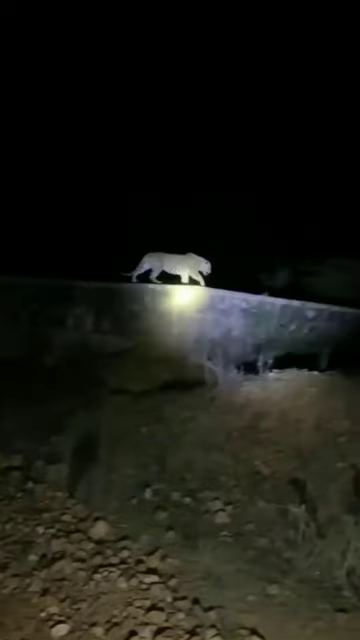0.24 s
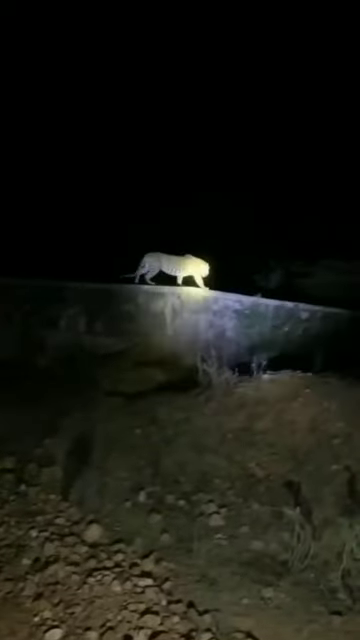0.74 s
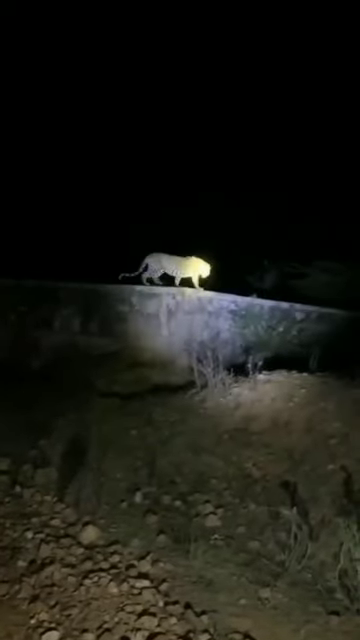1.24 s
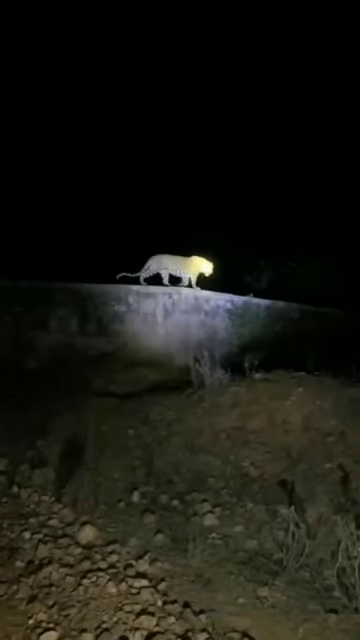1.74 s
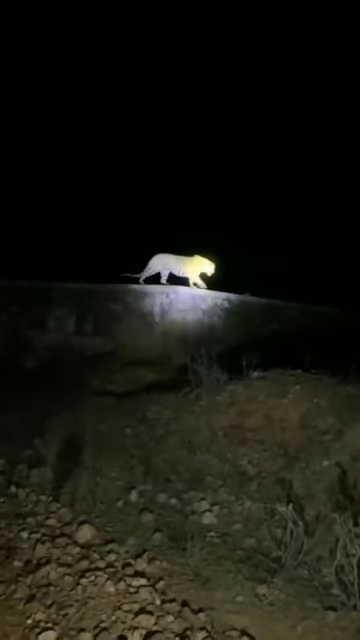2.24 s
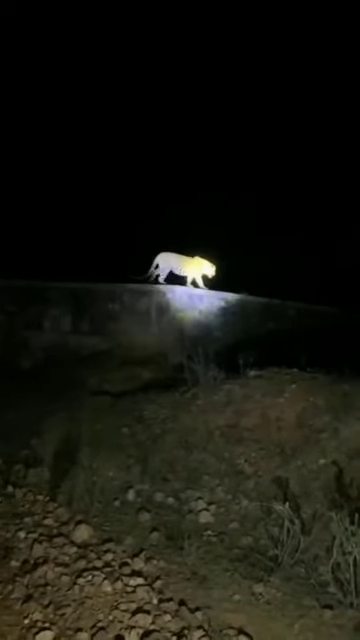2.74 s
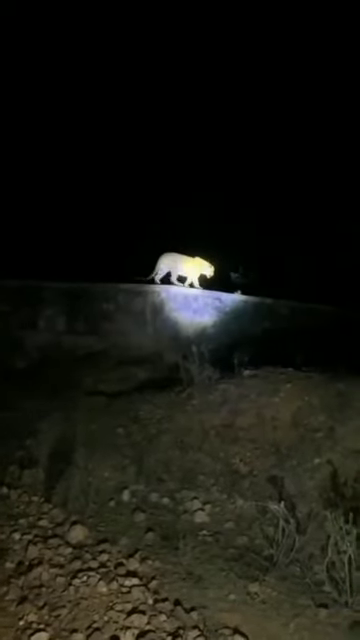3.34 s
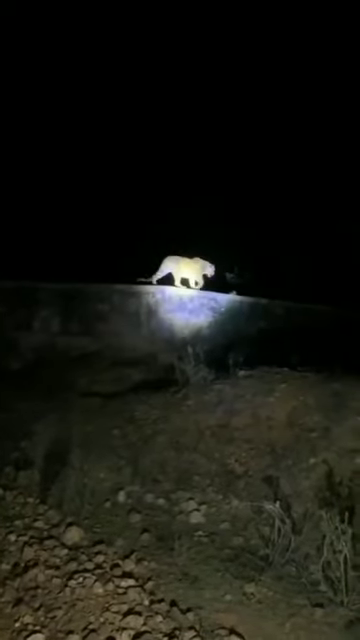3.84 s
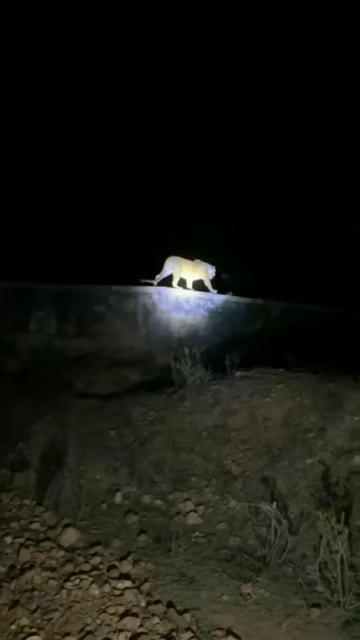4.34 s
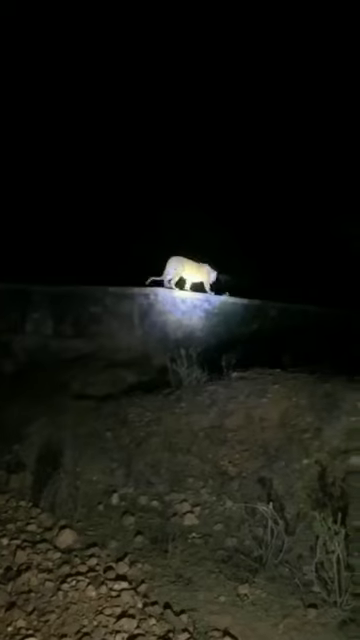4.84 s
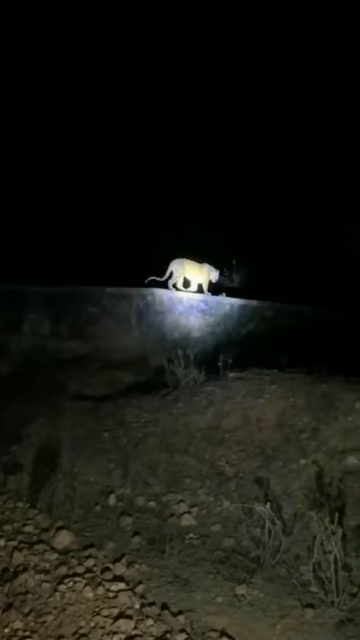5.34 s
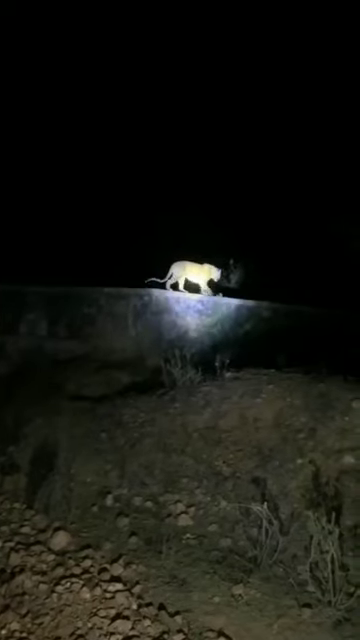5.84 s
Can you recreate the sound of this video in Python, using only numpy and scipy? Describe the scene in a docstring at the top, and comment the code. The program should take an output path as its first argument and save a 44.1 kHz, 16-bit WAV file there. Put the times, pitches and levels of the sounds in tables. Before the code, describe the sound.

A leopard calls in the open at night. A hoarse, breathy roar is already under way and dies away; a low pulsing growl then swells into a loud, crackling roar, sinks back to a rattle and ends in a soft moan. After a brief lull, a huff leads into a short tearing snarl with a fading noise tail. Wall and rocks return short echoes; a low rumble and faint hiss lie beneath. The cat sits slightly right.

```python
"""A leopard's roars at night

Three calls, a little to the right: a hoarse roar dies away; a long growl swells into a roar and ends in a soft moan;
a huff leads into a short, tearing snarl with a smooth, fading noise tail. Slack vocal folds slap some 20-36 times
a second: slaps and turbulence excite the resonances of chest, throat and mouth; hard closures add snaps and spray.
Wall and rocky ground add echoes and a scattered tail; dry ticks, a faint tone, a low rumble and faint hiss join in."""
import sys
import numpy as np
from scipy import signal
from scipy.fft import rfft, irfft, next_fast_len
from scipy.io import wavfile
from scipy.ndimage import uniform_filter1d, map_coordinates

SR = 44100
rng = np.random.default_rng(int(sys.argv[2]) if len(sys.argv) > 2 else 0)


def to_wav(sig):
    """Store sig (one row per channel, or 1-D mono) as 16-bit WAV at the path in sys.argv[1].

    Samples outside -1..1 are clipped; the rate is SR.
    """
    pcm = np.clip(np.atleast_2d(sig), -1, 1) * 32767
    pcm = np.round(pcm).astype(np.int16)
    wavfile.write(sys.argv[1], SR, pcm.T)  # frames by channels


N = 268153
TIME = np.arange(N) / SR

# slaps that crack out above their neighbours:
# (time [s], snap peak level [dB], snap frequency [Hz], spray level [dB])
CRACK_EVENTS = [(.197, -22.5, 1160, -48), (.225, -20.5, 1220, -49), (.259, -23, 1160, -50.5),
                (0.965, -32, 1310, -72), (1.044, -37, 1360, -74), (1.09, -34, 1420, -75),
                (1.127, -35, 1370, -71), (1.241, -34, 1446, -61), (1.279, -34, 1436, -57),
                (1.39, -34, 1390, -36), (1.427, -32, 1250, -50), (1.468, -26, 1490, -36.5),
                (1.506, -35, 1340, -44.5), (1.543, -25, 1452, -44.5), (1.621, -39, 1207, -39.5),
                (1.835, -23.5, 1387, -44), (1.902, -21.5, 1424, -48), (1.969, -19, 1240, -42),
                (2.002, -19.5, 1310, -41.5), (2.037, -17.5, 1300, -36), (2.101, -14, 1406, -40),
                (2.131, -20.5, 1203, -37.5), (2.161, -18.5, 1300, -37.5), (2.189, -17, 1280, -41),
                (2.245, -10, 1334, -28), (2.272, -11.5, 1320, -25), (2.33, -13.5, 1246, -22),
                (2.359, -11.5, 1250, -26.5), (2.419, -13, 1248, -28.5), (2.447, -11, 1320, -26),
                (2.506, -13.5, 1357, -39), (2.537, -12, 1320, -37), (2.569, -10, 1320, -30.5),
                (2.637, -17.5, 1335, -48.5), (2.674, -12, 1346, -43), (2.711, -17, 1347, -48.5),
                (2.749, -17.5, 1376, -39), (3.031, -30.5, 1410, -48.5), (3.198, -36, 1500, -70),
                (3.239, -37, 1410, -63), (3.32, -38, 1500, -74), (3.364, -38, 1470, -68),
                (4.503, -24.5, 1153, -68), (4.532, -20.5, 1060, -39.5), (4.569, -23, 1130, -38),
                (4.6, -16, 1190, -30), (4.636, -15, 1140, -32), (4.672, -26, 1140, -49.5),
                (4.709, -22, 1130, -48), (4.79, -22, 1300, -45.5), (4.832, -21, 1300, -36),
                (4.919, -27.5, 1130, -49), (4.974, -28, 1090, -48), (5.006, -30.5, 1256, -54),
                (5.056, -34.5, 1130, -58)]


def amp(db):
    """Level and amplitude: 20 dB is a factor of ten."""
    return 10 ** (np.asarray(db) / 20)


def unit(x):
    """Normalisation: x at a root-mean-square value of 1."""
    return x / np.sqrt(np.mean(x ** 2) + 1e-20)


def along(points, hz):
    """Interpolation of (frequency [Hz], value) points on a logarithmic frequency axis."""
    f, v = np.transpose(points)
    return np.interp(np.log(hz + 1), np.log(f + 1), v)


def curves(rows, t):
    """Linear interpolation of each column after the first, at the times t."""
    s, *cols = np.transpose(rows)
    return [np.interp(t, s, c) for c in cols]


def wobble(rate):
    """Band-limited randomness: a smooth curve through random knots, rate of them a second."""
    return map_coordinates(rng.standard_normal(int(N * rate / SR) + 4), [TIME * rate])


def coloured(x, gain):
    """Minimum-phase filtering: folding the cepstrum makes the filter with this gain causal."""
    m = 2 * next_fast_len((len(x) + SR // 4) // 2, True)
    log_gain = np.log(np.maximum(gain(np.fft.rfftfreq(m, 1 / SR)), 1e-6))
    cepstrum = irfft(log_gain, m)
    cepstrum[1:m // 2] *= 2
    cepstrum[m // 2 + 1:] = 0
    response = np.exp(rfft(cepstrum))
    return irfft(rfft(x, m) * response, m)[:len(x)]


def shaped(x, spectrum):
    """Spectral shaping: x filtered by (frequency [Hz], gain [dB]) points, at rms 1."""
    return unit(coloured(x, lambda hz: amp(along(spectrum, hz))))


def ring(x, modes):
    """Resonance: x excites a sum of steep-sided peaks, at rms 1."""
    def peak(f, centre, width):
        return 1 / (1 + .5 * ((centre ** 2 - f ** 2) / (f * width + 1)) ** 2) ** 2

    def gain(f):
        return sum(amp(db) * peak(f, centre, width) for centre, width, db in modes)

    return unit(coloured(x, gain))


def glided(x, modes, tuning):
    """Frequency scaling by a warped clock: all resonances slide by the factor tuning."""
    clock = np.cumsum(np.clip(tuning, .5, 2))
    steps = np.arange(int(clock[-1]) + 1)
    warped = np.interp(steps, clock, x)
    return np.interp(clock, steps, ring(warped, modes))


def even(x):
    """Envelope normalisation: slow swells are levelled, so that later gains set the loudness."""
    power = uniform_filter1d(uniform_filter1d(x ** 2, SR // 12), SR // 12)
    return x / np.sqrt(np.abs(power) + 1e-3)


def night():
    """Filtered noise: a steady low rumble, and a faint broadband hiss, its level falling steadily."""
    # rumble spectrum: (frequency [Hz], relative level [dB])
    rumble_spectrum = [(15, -12.5), (30, 2.5), (50, 2), (63, -7), (88, -23), (300, -23.5), (520, -35.5),
                       (750, -41.5), (1200, -46), (2000, -58), (4000, -68.5), (12000, -73.5)]
    # hiss spectrum: (frequency [Hz], relative level [dB])
    hiss_spectrum = [(200, -11), (1500, 4), (4000, 2.5), (8500, -3.5), (10000, -12.5), (13000, -15.5)]
    rumble_db, hiss_start_db, hiss_fall_db_per_s = -50.5, -72, 3.0
    rumble = amp(rumble_db) * shaped(rng.standard_normal(N), rumble_spectrum)
    hiss = shaped(rng.standard_normal(N), hiss_spectrum)
    return rumble + amp(hiss_start_db - hiss_fall_db_per_s * TIME) * hiss


def outdoors(x):
    """Reflection and scattering: discrete echoes off ground and wall, then a thin tail from the rocks."""
    # decay of the scattered tail: (frequency [Hz], time to fall 60 dB [s])
    tail_decay = [(100, 0.43), (500, 0.81), (1200, 0.42), (3000, 0.15), (9000, 0.064)]
    # echoes off ground and wall: (delay [s], level [dB])
    reflections = [(.0062, -13), (0.0119, -18.5), (.021, -15)]
    tail_db = -13
    hz, t, z = signal.stft(rng.standard_normal(SR), SR, nperseg=256)
    fading = z * amp(-60 * t / along(tail_decay, hz)[:, None])
    tail = signal.istft(fading, SR, nperseg=256)[1]
    answer = amp(tail_db) * tail / np.linalg.norm(tail)
    for delay, db in reflections:
        answer[round(delay * SR)] += amp(db)
    return x + signal.fftconvolve(x, answer)[:N]


def hoot(s=5.59, hz=595, db=-64, length=0.015):
    """Tone burst: a faint sinusoid under a Gaussian envelope."""
    return amp(db) * np.exp(-((TIME - s) / length) ** 2) * np.sin(2 * np.pi * hz * TIME)


def ticks():
    """Decaying noise bands: short dry rasps and ticks, each around its own frequency."""
    # (time [s], level [dB], centre [Hz], width [Hz], time to fall 60 dB [s])
    tick_events = [(1.341, -31.5, 670, 1400, 0.043), (1.337, -57, 3195, 3600, 0.33),
                   (4.42, -64, 2655, 5130, 0.017), (5.765, -75, 1927, 1615, 0.055),
                   (5.893, -79.5, 2100, 1606, 0.043), (5.912, -70, 1175, 805, 0.21)]
    out, t = np.zeros(N + SR), np.arange(SR // 3) / SR
    for s, db, hz, width, t60 in tick_events:
        burst = ring(rng.standard_normal(len(t)), [(hz, width, 0)])
        out[round(s * SR):][:len(t)] += amp(db - 60 * t / t60) * burst
    return out[:N]


def huff():
    """Turbulent flow: air rushes through the throat, starting ahead of the snarl and running on beneath it."""
    # spectrum of the rushing air: (frequency [Hz], relative level [dB])
    huff_spectrum = [(60, -11.5), (150, 0), (400, 3), (600, 3.5), (780, -16.5), (980, -9.5), (1350, -12.5),
                     (1800, -29), (5000, -58), (12000, -58.5)]
    start_s, attack_s, hold_s, release_s, level_db = 4.33, 0.047, 0.48, .04, -48.5
    corners = start_s + np.cumsum([0, attack_s, hold_s, release_s])
    opening = np.interp(TIME, corners, [0, 1, 1, 0])
    return amp(level_db) * opening * shaped(rng.standard_normal(N), huff_spectrum)


def moan():
    """Frequency modulation: a soft wavering tone through the closed mouth, husky with resonant noise."""
    # (time [s], mean pitch [Hz], level [dB])
    moan_course = [(3.5, 143.9, -62), (3.66, 168.6, -44), (3.72, 194.6, -50), (3.9, 195, -60.5),
                   (4.02, 171, -53), (4.15, 195, -66.5), (4.33, 183, -74.5)]
    tone_db, murk_db = -4, -1  # relative to that level
    pitch, level = curves(moan_course, TIME)
    waver = 1 + .05 * wobble(40)
    tone = np.sqrt(2) * np.sin(2 * np.pi * np.cumsum(pitch * waver) / SR)
    murk = ring(rng.standard_normal(N), [(122.3, 46, 0.5), (195, 48, -2.5), (350, 31, -10.5)])
    sounding = (TIME > moan_course[0][0]) * (TIME < moan_course[-1][0])
    return amp(level) * (amp(tone_db) * tone + amp(murk_db) * murk) * sounding


def noise_tail():
    """Sliding resonance: a smooth, fading noise around 1.1-1.3 kHz, sinking slightly, behind the snarl."""
    # bands of the tail at its start: (frequency [Hz], width [Hz], relative level [dB])
    tail_modes = [(1090, 117, 3), (1320, 130, 0)]
    start_s, attack_s, level_db, fade_db_per_s, sag_per_s = 4.984, .05, -50.5, 80, 0.15
    age = np.maximum(TIME - start_s, 0)
    noise = glided(rng.standard_normal(N), tail_modes, 1 - sag_per_s * age)
    return amp(level_db - fade_db_per_s * age) * np.minimum(age / attack_s, 1) * noise


def tears():
    """Modulated turbulence: ragged bursts of air excite the high resonances of the throat."""
    # air tearing through the throat: (time [s], length [s], level [dB])
    tear_events = [(4.753, 0.026, -46), (4.788, .026, -49), (4.911, .03, -51), (4.956, 0.035, -51.5),
                   (5.042, .026, -61)]
    # resonances of the throat: (frequency [Hz], width [Hz], relative level [dB])
    tear_modes = [(1920, 400, 2), (2610, 450, 2.5), (3116, 220, -10), (4410, 460, -10.5)]
    ragged_db, rips_per_s = 5, 260
    rips = amp(ragged_db * wobble(rips_per_s)) * rng.standard_normal(N)
    flow = np.zeros(N)
    for s, length, db in tear_events:
        progress = np.clip((TIME - s) / length, 0, 1)
        flow += amp(db) * np.sqrt(np.abs(np.sin(np.pi * progress)))
    return flow * ring(rips, tear_modes)


def cracks():
    """Impulse excitation: hard closures give a short snap, a ringing mouth and a bright spray of air."""
    # the mouth rings on behind a crack: (frequency [Hz], width [Hz], relative level [dB])
    body_modes = [(980, 180, 2.5), (1300, 230, 1.5), (1576, 120, -2.5)]
    # mean resonances of the spray: (frequency [Hz], width [Hz], relative level [dB])
    spray_modes = [(2150, 770, 5), (2740, 450, 9.5), (4290, 1200, -11.5), (7550, 4300, -23.5)]
    snap_width_hz = 336
    body_db, body_t60_s = -9, 0.046  # level relative to the snap's peak
    rise_s, spray_t60_s = .0007, .024
    varies_db, varies_share = 3, .04  # spread of the spray's resonances from crack to crack
    out, t = np.zeros(N + SR), np.arange(SR // 10) / SR
    rise = 1 - np.exp(-t / rise_s)
    for s, db, hz, spray_db in CRACK_EVENTS:
        snap = ring(1.0 * (t == 0), [(hz, snap_width_hz, 0)])
        body_noise = ring(rng.standard_normal(len(t)), body_modes)
        body = amp(db + body_db - 60 * t / body_t60_s) * body_noise
        colour = [(f * rng.normal(1, varies_share), width, rng.normal(level, varies_db))
                  for f, width, level in spray_modes]
        spray_noise = ring(rng.standard_normal(len(t)), colour)
        spray = amp(spray_db - 60 * t / spray_t60_s) * spray_noise
        crack = amp(db) * snap / np.abs(snap).max() + rise * (body + spray)
        out[round(s * SR):][:len(t)] += crack
    return out[:N]


def folds(rate, t, scatter_db=2.0):
    """Relaxation oscillation: returns slaps, sharpness of closure, non-cracking slaps and place in the cycle."""
    # at full force every third slap closes softly: (time [s], depth [0-1])
    soft_thirds = [(2.17, 0), (2.22, 0.5), (2.48, 0.3), (2.52, 0)]
    phase = np.cumsum(curves(rate, t)[0]) / SR
    # the phase is bent so that every crack falls on a closure
    crack_s = [t[0]] + [row[0] for row in CRACK_EVENTS if t[0] < row[0] < t[-1]]
    at_crack = np.interp(crack_s, t, phase)
    phase = np.abs(phase + np.interp(t, crack_s, np.round(at_crack) - at_crack))
    cycle = phase.astype(int)
    size = amp(scatter_db * rng.standard_normal(200))[cycle]
    depth = np.clip(curves(soft_thirds, t)[0], 0, 1)
    sharpness = size * (1 - depth * (np.mod(cycle, 3) == 1))
    plain = ~np.isin(cycle, np.round(at_crack[1:]))
    slaps = unit(size * (np.diff(cycle, prepend=-1) > 0))
    return slaps, sharpness, plain, phase % 1


def bounces(phase, t):
    """Rebound: slack folds close a second time, more lightly, at an uneven place in each cycle."""
    # (time [s], size against the main slaps [ratio])
    bounce_size = [(2.6, 0), (2.8, .4), (3.2, .65), (3.5, .5), (3.8, .3), (4.58, 0), (4.63, .4), (4.73, .7),
                   (4.85, .3), (5.0, .5)]
    earliest, latest = .3, .7  # share of the cycle
    cycle = np.cumsum(np.diff(phase, prepend=0) < -.5)
    past = phase > rng.uniform(earliest, latest, cycle[-1] + 1)[cycle]
    closures = unit(1.0 * (np.diff(past.astype(int), prepend=0) > 0))
    return curves(bounce_size, t)[0] * closures


def cavity(x, tract, jaw, lo, hi, tuning=1):
    """Source-filter principle: resonances from lo to hi Hz; an opening jaw cross-fades to the open tract."""
    # the tract with the jaw wide open: (frequency [Hz], width [Hz], relative level [dB])
    open_tract = [(99, 60, -12), (138.6, 33, -5), (354.4, 62, -0.5), (451, 56, -6), (528.7, 54, -4),
                  (717, 77, -15), (880, 200, -14.5), (1091, 79, -4.5), (1320, 170, -10), (1542, 170, -15.5),
                  (1930, 130, -31.5), (3010, 430, -27)]
    slide = tuning * np.ones(len(x))

    def through(modes):
        return glided(x, [mode for mode in modes if lo <= mode[0] < hi], slide)

    return even((1 - jaw) * through(tract) + jaw * through(open_tract))


def call(rate, effort, tract, belly_db, chest_db, throat_db, mouth_db, rasp_db, spray_db, air_db, snap_db,
         push_from_s, push_for_s, rough_start, rough_end, fray_s, rasp_grows, spray_grows,
         brighten_db_per_s, darken_db_per_s):
    """Source-filter voice: slaps and turbulence excite the tract, under control of effort, jaw and flow."""
    # opening of the jaw: (time [s], opening [0-1])
    jaw_course = [(.7, 0.46), (.9, 0.22), (1.1, 0.13), (1.75, 0.01), (2.05, 0.21), (2.22, 0.85),
                  (2.58, 0.79), (3.0, 0.51), (3.2, 0.17)]
    # lips and cheeks slide the mouth's resonances: (time [s], factor)
    mouth_tuning = [(.7, 1.06), (.88, 0.82), (.97, 0.88), (1.1, 1), (1.3, 1.03), (2.3, 0.98), (2.7, 1.023),
                    (3.05, 0.96), (3.35, 1.03), (3.7, 1.02), (4.5, 1.03), (4.85, 1), (5.05, 1), (5.2, 0.83)]
    # the throat shortens and lengthens: (time [s], mean factor on its resonances)
    throat_tuning = [(.05, 1.006), (.35, 0.98), (.95, 1.02), (1.3, 0.94), (1.6, 1.05), (2.02, 1.04),
                     (2.12, 1.06), (2.2, .99), (2.7, 1.026), (3.1, 1.012), (3.35, 1.014), (3.6, 1),
                     (4.5, 1.07), (4.6, 1.056), (4.7, 0.94), (4.85, 0.97), (5.1, 0.96)]
    # the tongue slides one narrow resonance: (time [s], frequency [Hz], level in the mouth [dB])
    tongue_course = [(0, 912, -1.5), (.15, 873, 3), (.5, 816, -2), (.8, 900, 6), (.95, 944, -5.5),
                     (1.15, 1022, 4.5), (1.28, 1049, 1.5), (1.55, 1025, -1.5), (1.8, 1015, -1.5),
                     (2.08, 962.5, 4), (2.23, 854.6, 0), (2.45, 875, 1.5), (2.7, 980, -5), (3.1, 998, 0),
                     (3.35, 1114, -9.5), (3.7, 1141, -2), (4.5, 944, 0.5), (4.68, 954, 8.5),
                     (4.8, 942, 2.5), (4.9, 973, -1.5), (5.08, 1130, -3), (5.3, 1076, 2)]
    # duller and brighter snap of a slap: (frequency [Hz], width [Hz], relative level [dB])
    snap_modes = [(1250, 160, 0.5), (1454, 190, -3)]
    # levels above what effort, jaw and flow give: (time [s], level [dB])
    chest_level, throat_level = [(0, -0.5), (.45, -0.5), (.85, -3.5), (1.05, 4), (1.28, 7), (1.53, 6),
                                 (1.7, 3), (2.1, -3.5), (2.27, 3), (2.45, 4), (2.7, -1), (2.78, 0.5),
                                 (3.0, 0.5), (3.35, 2), (3.55, 0.5), (4.55, -1), (4.62, -3), (4.75, 1),
                                 (4.87, 2.5), (4.98, 1.5), (5.05, -2.5), (5.25, -0.5)], [(0, -7), (.08, 2), (.27, 0), (.35, -2.5), (.7, 2),
                                                      (1.35, -3.5), (1.7, 4), (2.12, 1.5), (2.22, 6),
                                                      (2.32, -0.5), (2.45, 0), (2.85, 2), (3.3, 0),
                                                      (4.56, 0.5), (4.62, 0), (4.72, 2.5), (4.87, 2),
                                                      (5.05, -1)]
    mouth_level, rasp_level = [(.2, -1), (.88, -3), (1.05, -1.5), (1.35, -1), (2.6, -.5), (2.87, -0.5),
                               (3.1, -0.5), (3.25, 1), (3.5, -1.5), (3.63, 3), (4.5, 0.5), (4.64, -1),
                               (4.68, -6.5), (4.8, 3), (4.87, -8), (4.93, 3), (4.99, -2), (5.1, 1),
                               (5.2, -6)], [(.17, 1.5), (.32, -1), (.48, 4), (.7, -16), (.9, -5.5),
                                                    (1.1, -7.5), (1.25, 3), (1.6, 1.5), (2.1, -1),
                                                    (2.45, -1), (2.65, -4.5), (2.83, 2.5), (2.95, 3.5),
                                                    (3.45, 3.5), (4.5, -12), (4.6, -6), (4.7, -1.5),
                                                    (4.87, -1.5), (5.05, -1.5)]
    # spectrum of the rushing air: (frequency [Hz], relative level [dB])
    air_spectrum = [(30, -25), (60, -5), (140, 7.5), (250, 9), (560, 1), (680, 2.5), (850, -0.5), (1000, 0),
                    (1500, -12), (1800, -13.5), (3000, -25.5), (5000, -33.5), (6500, -39.5), (8400, -41.5),
                    (9600, -53.5), (13000, -60)]
    # spectrum of the bright spray: (frequency [Hz], relative level [dB])
    spray_spectrum = [(1200, -56.5), (1900, 10), (3000, -1), (4000, -2.5), (5300, -9), (8000, -6),
                      (9500, -42), (12500, -32)]

    span = (TIME >= rate[0][0]) & (TIME < effort[-1][0])
    t = TIME[span]
    age = t - t[0]
    force = curves(effort, t)[0] + 16  # dB relative to the effort of a full roar, -16 dB
    jaw = np.clip(curves(jaw_course, t)[0], 0, 1)
    # the share of turbulence drifts with age; a wide open jaw takes some away
    frayed = rough_end + (rough_start - rough_end) * np.exp(-(age / fray_s) ** 2)
    rough = np.clip(frayed * (1 - 0.068 * jaw), .01, .99)

    # sources: air escapes most just after each slap
    slaps, sharpness, plain, phase = folds(rate, t)
    sharp_slaps = unit(slaps * sharpness)
    open_share, spray_share, rasp_share = 0.94, 0.45, 0.29  # decay of each puff, as a share of the cycle
    gate = 0.4 + sharpness * np.exp(-phase / open_share)  # 0.4 leaks throughout

    def air(opening):
        return unit(opening * rng.standard_normal(len(t)))

    def roughened(pulses, share):
        return np.sqrt(1 - share) * pulses + np.sqrt(share) * air(gate)

    low = roughened(slaps, rough + (1 - rough) * 0.26)
    bounce = bounces(phase, t)
    high = roughened(sharp_slaps + bounce, rough)
    spray = roughened(air(sharpness * np.exp(-phase / spray_share)), rough)

    # a clean closure snaps ahead of the mouth's ringing, now duller, now brighter
    bright = np.clip(0.84 - 0.36 * jaw + .3 * wobble(22)[span], 0, 1)
    snaps = sharp_slaps * plain + bounce
    lips = curves(mouth_tuning, t)[0]
    dull_snap = glided(snaps * np.sqrt(1 - bright), snap_modes[:1], lips)
    bright_snap = glided(snaps * np.sqrt(bright), snap_modes[1:], lips)
    snap = unit(dull_snap + bright_snap)

    # resonators: chest, throat, mouth, tongue and the rasp above them
    boom = cavity(low, tract, jaw, 0, 200)
    throat_slide = curves(throat_tuning, t)[0] + .022 * wobble(12)[span]
    vowel = cavity(low, tract, jaw, 200, 780, throat_slide)
    rattle = cavity(high, tract, jaw, 780, 1800, lips)
    tongue_hz, tongue_db = curves(tongue_course, t)
    centre_hz, tongue_width_hz = tongue_hz.mean(), 65.4
    tongue_ring = glided(high, [(centre_hz, tongue_width_hz, 0)], tongue_hz / centre_hz)
    tongue = amp(tongue_db) * even(tongue_ring)
    # the rasp flares and falters
    flare_db, flares_per_s = 3, 90
    flare = amp(flare_db * wobble(flares_per_s)[span])
    rasp_bursts = flare * roughened(air(sharpness * np.exp(-phase / rasp_share)), rough)
    rasp = cavity(rasp_bursts, tract, jaw, 1800, 9000)

    # the rush of air builds up to each push and fades once it is spent
    rise_db_per_s, fade_db_per_s = 21, 24
    before_s = np.maximum(push_from_s - t, 0)
    after_s = np.maximum(t - push_from_s - push_for_s, 0)
    flow_db = -rise_db_per_s * before_s - fade_db_per_s * after_s
    heave = np.interp(t - 0.03, t, force)  # the belly heaves 0.03 s after the effort

    # level laws: dB per dB of effort, dB per dB of flow, dB of a wide open jaw
    belly_gain = belly_db + 0.4 * heave + 0.86 * flow_db - 5 * jaw
    chest_gain = chest_db + 0.72 * force - 0.14 * flow_db + 0.5 * jaw + curves(chest_level, t)[0]
    # as a call ages, its weight shifts between mouth and throat
    throat_gain = throat_db + force - 2.5 * jaw + darken_db_per_s * age + curves(throat_level, t)[0]
    mouth_gain = mouth_db + 0.94 * force + 2 * jaw - darken_db_per_s * age + curves(mouth_level, t)[0]
    # soft slaps mostly ring the tract; forceful ones spray far into the treble
    rasp_gain = rasp_db + rasp_grows * force + 0.28 * flow_db - 3.5 * jaw
    rasp_gain += brighten_db_per_s * age + curves(rasp_level, t)[0]
    spray_gain = spray_db + spray_grows * force + 9.5 * jaw + brighten_db_per_s * age
    air_gain = air_db + 0.82 * force + flow_db

    voice = amp(belly_gain) * even(ring(low, [(57.4, 36, 0.00076)]))
    voice += amp(chest_gain) * boom
    voice += amp(throat_gain) * vowel
    voice += amp(mouth_gain) * (rattle + tongue + amp(snap_db) * np.sqrt(1 - rough) * snap)
    voice += amp(rasp_gain) * rasp
    voice += amp(spray_gain) * shaped(spray, spray_spectrum)
    voice += amp(air_gain) * shaped(air(gate), air_spectrum)
    out = np.zeros(N)
    out[span] = voice * np.clip((t[-1] - t) / 0.035, 0, 1)
    return out


def scene():
    """Superposition: three calls and their noises sound outdoors; a level difference places them to the right."""
    # mean slap rate of the vocal folds: (time [s], rate [slaps/s])
    hoarse_rate, long_rate, snarl_rate = [(0, 26.6), (.85, 26.4)], [(.892, 27.2), (1.06, 24.1), (1.18, 26.8),
                                                               (1.35, 26.6), (1.6, 25.4), (1.74, 29.1),
                                                               (2.05, 30), (2.22, 36.5), (2.38, 33.7),
                                                               (2.48, 34.4), (2.66, 27.1), (2.85, 23.5),
                                                               (2.94, 26.4), (3.05, 24), (3.4, 24.1),
                                                               (3.8, 23.4)], [(4.502, 30.4),
                                                                                  (4.62, 29.2), (4.74, 24),
                                                                                  (4.86, 24.7),
                                                                                  (4.95, 20.5),
                                                                                  (5.05, 23.9),
                                                                                  (5.15, 23.6)]
    # effort of each call: (time [s], effort [dB])
    hoarse_effort, long_effort = [(0, -8.5), (0.05, -9.5), (0.14, -11), (.19, -15), (0.27, -19), (0.3, -22),
                                  (0.5, -22.5), (0.58, -32.5), (0.75, -42.5), (0.9, -43.5)], [(0.88, -39.5), (0.97, -38.5), (1.17, -43),
                                                         (1.3, -37.5), (1.55, -27), (1.7, -34),
                                                         (1.85, -28.5), (2.05, -17.5), (2.25, -14),
                                                         (2.47, -13.5), (2.62, -19), (2.77, -19.5),
                                                         (2.82, -26), (2.92, -32.5), (3.03, -32),
                                                         (3.13, -41), (3.35, -38), (3.63, -49.5),
                                                         (3.8, -76)]
    snarl_effort = [(4.5, -30), (4.56, -21), (4.61, -18), (4.7, -22.5), (4.83, -27.5), (4.95, -29.5),
                    (5.07, -41), (5.14, -61), (5.23, -64), (5.42, -76.5)]
    # resonances of the tract before jaw and tuning: (frequency [Hz], width [Hz], relative level [dB])
    hoarse_tract, long_tract, snarl_tract = [(121.7, 39, 10), (213.5, 24, 4), (260.6, 40, 4),
                                             (339, 164, -1.5), (512, 80, 3.5), (567, 41, 3),
                                             (870, 200, -22), (1180, 84, -25), (1500, 270, -26),
                                             (2100, 480, -40), (2713, 210, -31), (3320, 230, -35)], [(110, 36, 13.5), (135, 15, -3.5),
                                                                   (350.4, 74, -4.5), (527, 66, -5.5),
                                                                   (1130, 183, -18), (1355, 95, -6),
                                                                   (1603, 113, -10.5), (2115, 240, -27),
                                                                   (2940, 190, -27.5)], [(117, 51.5, 8),
                                                                                       (141, 50, -12),
                                                                                       (235, 60, -5.5),
                                                                                       (315.5, 108, 1),
                                                                                       (483.7, 53, -0.5),
                                                                                       (779.3, 170, -31.5),
                                                                                       (1087, 53, 3.5),
                                                                                       (1300, 180, -4.5),
                                                                                       (1590, 125, -9),
                                                                                       (1802, 400, -23.5),
                                                                                       (2100, 360, -19.5),
                                                                                       (2510, 210, -14),
                                                                                       (2870, 290, -17),
                                                                                       (4170, 1100, -34)]
    # turbulence in the long call before the jaw acts: (share at the start [0-1], share it tends to [0-1])
    long_rough = (.24, .34)
    hoarse = call(
        hoarse_rate, hoarse_effort, hoarse_tract,
        belly_db=-40.5, chest_db=-24.0, throat_db=-18.5, mouth_db=-38,
        rasp_db=-53.0, spray_db=-62.5, air_db=-29.0, snap_db=-2.5,
        push_from_s=0, push_for_s=0.68, rough_start=0.76, rough_end=1.0, fray_s=.5,
        rasp_grows=0.81, spray_grows=2.2, brighten_db_per_s=-2, darken_db_per_s=-1.0)
    long = call(
        long_rate, long_effort, long_tract,
        belly_db=-34.0, chest_db=-25.0, throat_db=-23, mouth_db=-32.5,
        rasp_db=-50.0, spray_db=-52, air_db=-25.5, snap_db=-1,
        push_from_s=1.566, push_for_s=0.71, rough_start=long_rough[0], rough_end=long_rough[1], fray_s=1.3,
        rasp_grows=0.68, spray_grows=2.0, brighten_db_per_s=-1.5, darken_db_per_s=0.73)
    snarl = call(
        snarl_rate, snarl_effort, snarl_tract,
        belly_db=-37, chest_db=-26.0, throat_db=-23.0, mouth_db=-33.0,
        rasp_db=-44, spray_db=-64.5, air_db=-39.0, snap_db=-11.5,
        push_from_s=4.6, push_for_s=0.03, rough_start=0.03, rough_end=0.6, fray_s=0.23,
        rasp_grows=1.27, spray_grows=1.4, brighten_db_per_s=25.0, darken_db_per_s=-1.0)
    animal = hoarse + long + snarl + cracks() + tears() + noise_tail() + moan() + huff()
    mono = outdoors(animal + ticks() + hoot()) + night()
    return mono * amp([[-2.5], [2]])  # left, right


def record(dry):
    """Saturation and band limiting: the loudest peaks are rounded off, then the top of the band is cut."""
    top_hz = 13000
    rounded = dry / (1 + np.abs(dry / .9) ** 8) ** (1 / 8)
    m = next_fast_len(N + SR // 4)
    passed = np.fft.rfftfreq(m, 1 / SR) < top_hz
    return irfft(rfft(rounded, m) * passed, m)[:, :N]


dry = scene()
out = record(dry)
to_wav(out)
```